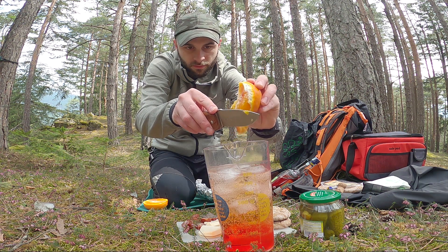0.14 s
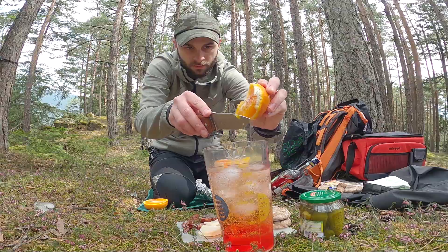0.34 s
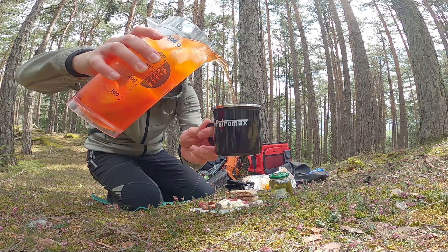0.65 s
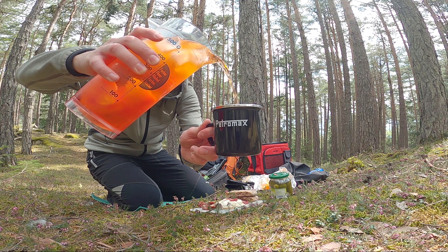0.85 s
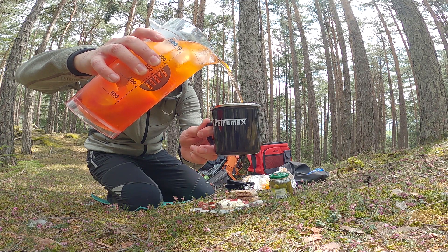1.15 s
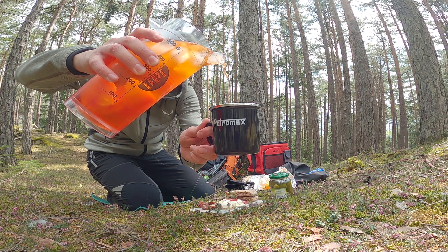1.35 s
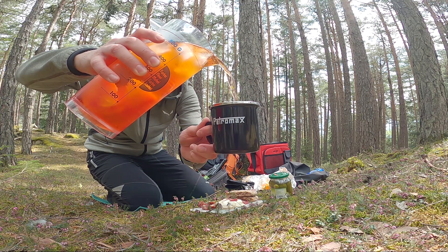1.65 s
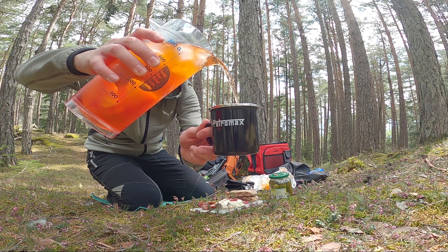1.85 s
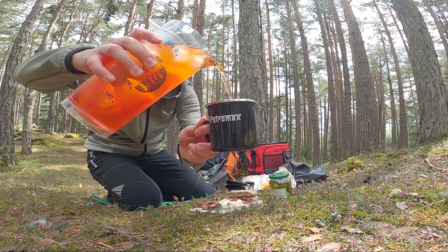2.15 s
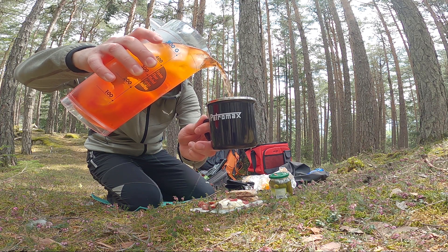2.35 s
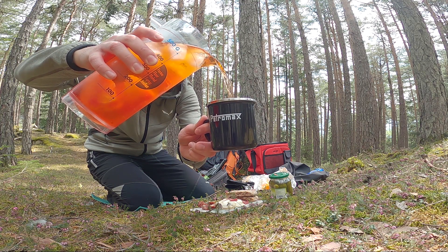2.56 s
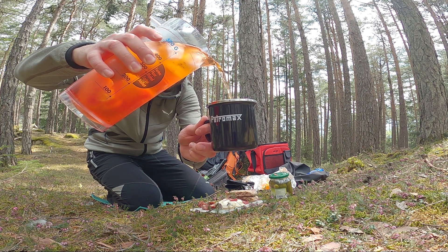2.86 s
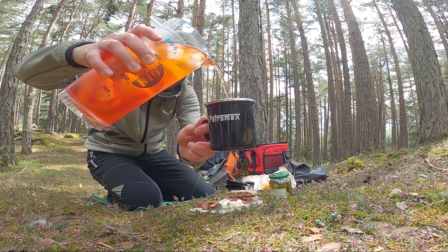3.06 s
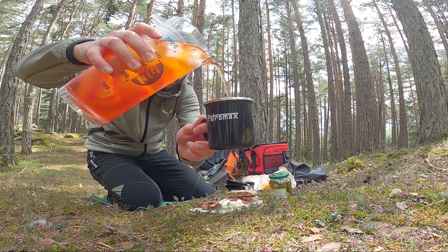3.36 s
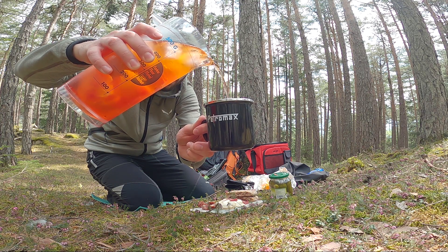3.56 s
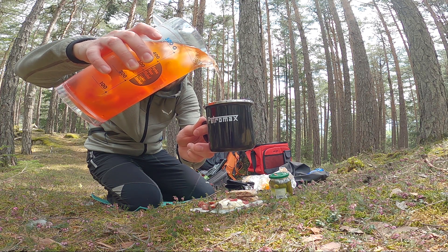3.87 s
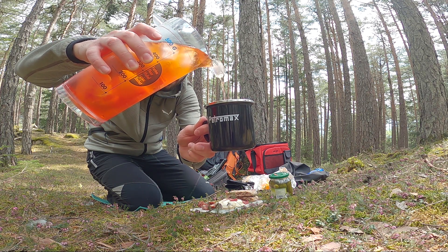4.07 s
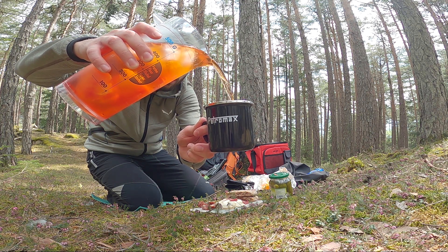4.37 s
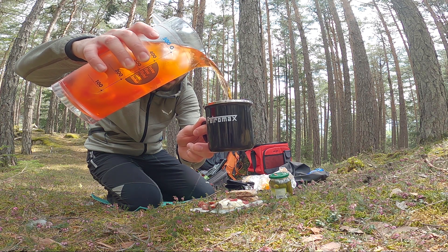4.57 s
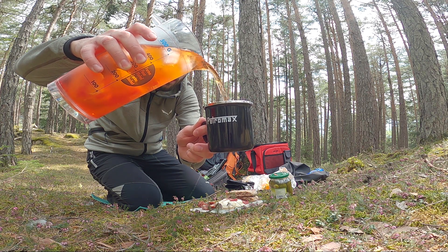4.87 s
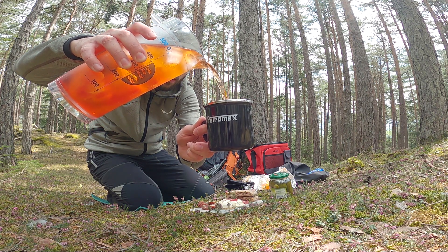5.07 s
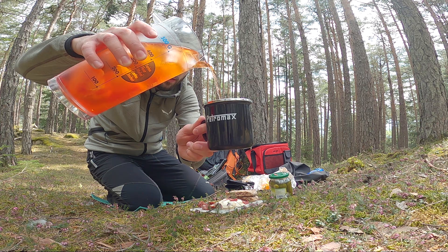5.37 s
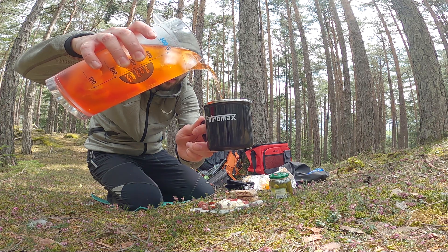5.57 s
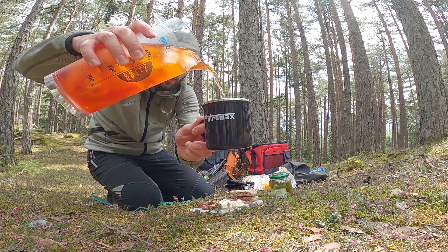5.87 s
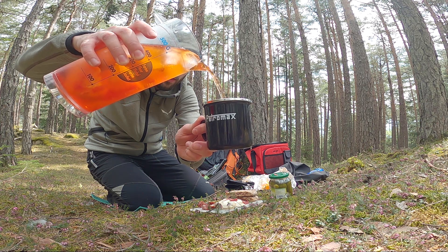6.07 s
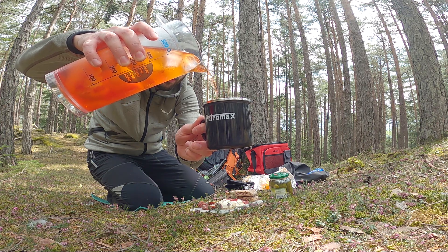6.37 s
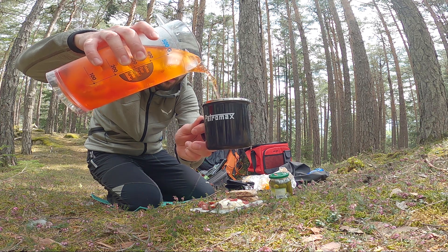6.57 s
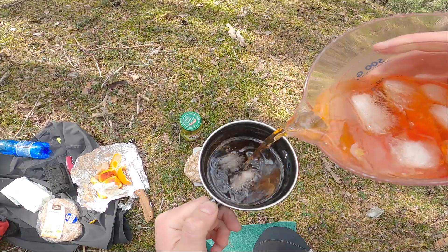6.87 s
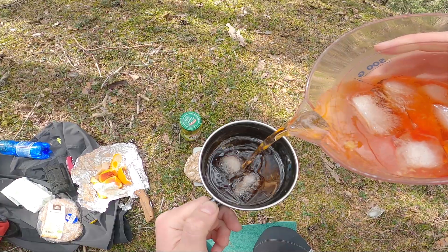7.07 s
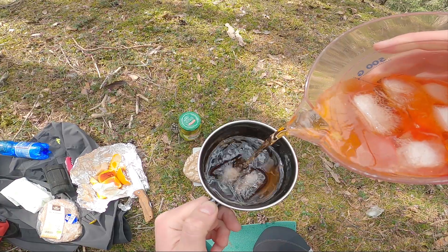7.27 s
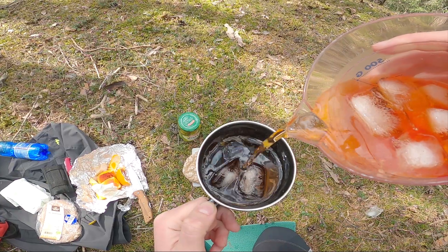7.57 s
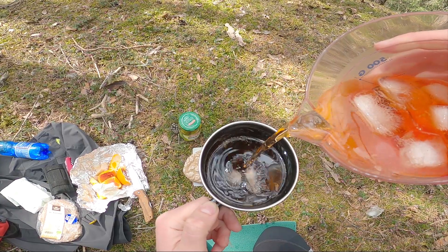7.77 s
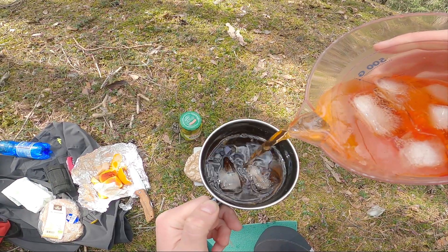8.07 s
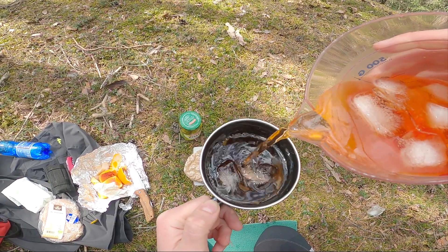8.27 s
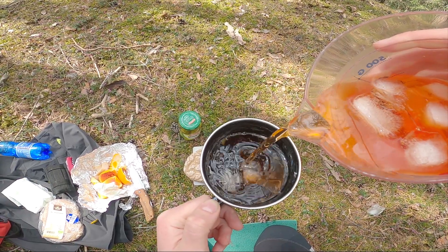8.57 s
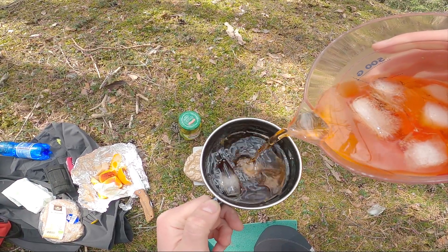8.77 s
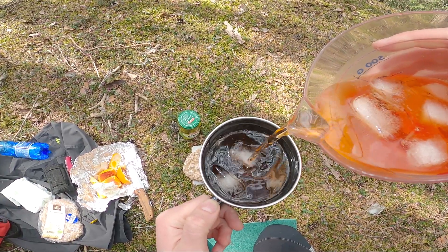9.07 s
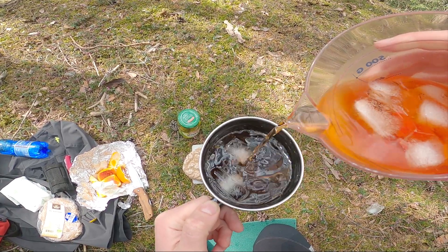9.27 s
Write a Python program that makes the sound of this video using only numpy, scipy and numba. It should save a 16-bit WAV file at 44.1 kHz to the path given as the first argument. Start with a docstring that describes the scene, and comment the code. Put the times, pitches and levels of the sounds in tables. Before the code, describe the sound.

Close and detailed outdoor pouring: after a moment of soft wind and one faint drip, liquid spatters on ice and steel, settling into lumpy gurgles with hollow plops, fizzy little bubbles and sharp ice cracks. The flow repeatedly weakens and spurts, then stops. A few tiny blips remain over low wind, light treetop rustle and a distant buzzy bird call, with only a slight echo from the trees.

```python
"""Low wind rumble and one faint drip, then an iced drink pours into a metal mug in a quiet wood.
Stream: clumped drops make noise ticks and bending bubble tones, coloured by the filling mug's resonances.
Gushes, slaps and drips are shaped noise, rings and bubbles; ice knocks and hollow plops are decaying modes
and noise cracks, with bubbles in their wake; single bubbles give low plops and short high blips.
Wind is coloured noise; a far bird, trilled sine whistles, calls in the last seconds."""
import sys
import numpy as np
from scipy import signal
from scipy.fft import rfft, irfft, next_fast_len
from scipy.io import wavfile
from scipy.ndimage import uniform_filter1d
from numba import njit

SR = 44100
rng = np.random.default_rng(int(sys.argv[2]) if len(sys.argv) > 2 else 0)


def persist_wave(psi):
    """Save psi, clipped to +-1, as 16-bit WAV."""
    counts = np.round(np.clip(psi, -1, 1) * 32767).astype(np.int16)
    wavfile.write(sys.argv[1], SR, np.atleast_2d(counts).T)


N = 415409
TIME_S = np.arange(N) / SR

# ice knocks in the mug, and some hollow plops with hardly any crack;
# levels before mode and layer gains: start_s, pitch_hz, hollow_db, crack_db
KNOCKS_AND_PLOPS = [(0.468, 860, -35, -26.5), (0.5322, 1340, -26.5, -50), (1.0665, 1050, -25, -37),
                    (1.455, 1205, -28, -40), (1.79, 1306, -23, -17.5), (1.8106, 1420, -27, -16),
                    (1.835, 984, -30.5, -17.5), (1.8715, 1310, -31, -24), (1.893, 1054, -21, -24.5),
                    (2.139, 1047, -30, -69), (2.674, 1475, -35.5, -35.5), (2.8132, 1060, -31, -39.5),
                    (2.9002, 1072, -32, -57), (2.971, 1054, -33, -57), (3.3545, 1166, -29.5, -63),
                    (4.1911, 891, -35.5, -34), (4.3216, 1396, -22.5, -25), (4.3261, 1065, -21, -23.5),
                    (4.3369, 1148, -17, -13), (4.364, 1202, -14.5, -17), (4.3815, 970, -17.5, -24),
                    (4.405, 983, -19, -35.5), (4.5725, 1205, -34, -38), (4.7707, 1095, -19, -24.5),
                    (4.796, 1400, -19.5, -32), (4.8147, 1406, -31, -34), (4.8337, 1195, -31, -37),
                    (4.9674, 1147, -36.5, -34.5), (5.197, 1891, -29, -35), (5.2586, 1307, -32, -49),
                    (5.273, 1226, -30.5, -39), (5.371, 1397, -25, -42), (5.411, 1276, -34, -42),
                    (5.8958, 1028, -28.5, -52), (6.0379, 1275, -43, -31), (6.84, 943, -35.5, -36),
                    (7.9328, 1980, -35, -39.5), (8.908, 2410, -47.5, -53.5), (9.0989, 2347, -38.5, -47.5),
                    (9.3288, 1975, -37, -44)]
# colour of the crack of ice: freq_hz, relative_db
CRACK_COLOUR = [(400, -22.5), (900, 5), (2000, 12.5), (3300, 8), (5200, 4), (6800, -3.5), (8500, -11.5),
                (11000, -23.5), (15000, -39.5)]
SMALL_CYCLES, SMALL_RISE = 11, .08  # small bubbles: life in cycles, rise as a share of pitch


def undb(db):
    """Decibels to amplitude gain."""
    return 10 ** (np.asarray(db) / 20)


def curves(table):
    """Interpolate each column of a timed table, sample by sample."""
    start_s, *columns = np.transpose(table)
    return [np.interp(TIME_S, start_s, column) for column in columns]


def add(track, start_s, sound):
    """Mix a sound into a track at a time."""
    start = max(int(start_s * SR), 0)
    part = track[start:start + len(sound)]
    part += sound[:len(part)]


def unit(x):
    """Scale to rms 1."""
    return x / np.sqrt(np.mean(x ** 2))


def even(x, span_s):
    """Hold the running rms near 1, keeping the quick grain."""
    size = int(span_s * SR)
    power = uniform_filter1d(uniform_filter1d(x ** 2, size), size)
    floor = np.mean(x ** 2) / 1000
    return x / np.sqrt(np.abs(power) + floor)


def colour(x, points):
    """Filter by an outline of (freq_hz, gain_db), straight over log frequency."""
    freq_hz, gain_db = np.transpose(points)
    size = next_fast_len(N + 4096)
    bins_hz = np.maximum(np.arange(size // 2 + 1) * SR / size, 1)
    gain = undb(np.interp(np.log(bins_hz), np.log(freq_hz), gain_db))
    return irfft(rfft(x, size) * gain, size)[:N]


@njit
def resonate(x, centre_hz, width_hz):
    """State-variable band-pass with a moving centre, gain 1 there."""
    y, band, low = np.empty(len(x)), 0., 0.
    for i in range(len(x)):
        g, damping = np.tan(np.pi * centre_hz[i] / SR), width_hz / centre_hz[i]
        v = (band + g * (x[i] + 1e-18 - low)) / (1 + g * (g + damping))
        band, low, y[i] = 2 * v - band, low + 2 * g * v, damping * v
    return y


def fade(t60_s):
    """Exponential decay down to -60 dB."""
    return np.exp(-np.log(1000) * np.arange(int(t60_s * SR) + 2) / (t60_s * SR))


def burst(attack_s, hold_s, t60_s):
    """Hold then exponential decay, under a linear attack from the start."""
    shape = np.concatenate([np.ones(int(hold_s * SR)), fade(t60_s)])
    return shape * np.minimum(np.arange(len(shape)) / (attack_s * SR), 1)


def ring(pitch_hz, t60_s):
    """One struck mode: a decaying sine that takes a cycle or two to build."""
    decay = fade(t60_s)
    cycles = pitch_hz * np.arange(len(decay)) / SR
    build = 1 - np.exp(-(cycles / 1.65) ** 2)
    return decay * build * np.sin(2 * np.pi * cycles)


def bubble(first_hz, last_hz, length_s, swell):
    """A bubble swells, then dies away, its pitch bending ever faster as it nears the surface."""
    u = np.linspace(0, 1, max(int(length_s * SR), 8))
    shape = (1 - np.exp(-(u / swell) ** 2)) * (1 - u) ** 0.92
    pitch_hz = first_hz + (last_hz - first_hz) * u ** 2
    return shape / shape.max() * np.sin(2 * np.pi * np.cumsum(pitch_hz) / SR)


def in_mug(x, t60_s=0.021, wet_db=-7):
    """Add bounces between the steel walls: convolution with decaying noise."""
    decay = fade(t60_s)
    echo = decay * rng.standard_normal(len(decay))
    return x + undb(wet_db) * signal.fftconvolve(x, echo / np.linalg.norm(echo))[:N]


def pour():
    """Gains of gurgle, splash and spray: choked flow plus spurts, summed in power."""
    # stream strength: strong at first, then swelling and thinning by turns until it stops:
    # time_s, strength_db
    flow_table = [(.44, -84), (.48, -59), (.7, -60), (.765, -68), (.83, -53.5), (1.2, -50), (1.45, -55),
                  (1.7, -54.5), (1.95, -57.5), (2.3, -66), (3.0, -59), (3.85, -66), (4.3, -56), (4.7, -65),
                  (5.35, -65), (5.9, -54), (6.22, -64), (6.7, -59), (7.1, -64), (7.74, -62.5),
                  (7.95, -81.5)]
    # treble lift, higher where the stream lands on ice than in the drink: time_s, brightness_db
    bright_table = [(.95, 7), (1.15, -0.5), (1.4, 1), (1.68, 8.5), (2.05, 0.5), (5.6, 1.5), (7.35, 8),
                    (8.0, -4)]
    # ice chokes the spout for a moment: start_s, length_s
    choke_table = [(0.723, 0.056), (2.403, 0.071), (5.07, 0.0544), (7.826, 0.08)]
    # a faint drip, then spurts that slip past the ice: start_s, hold_s, strength_db, brightness_db
    spurt_table = [(0.182, 0.04, -81, 19.5), (.68, 0.022, -56, 4), (0.791, 0.086, -53.5, 14.5),
                   (0.937, 0.048, -55, 14), (1.043, 0.059, -45, -0.5), (1.468, 0.06, -46, 1.5),
                   (3.005, .16, -53, -1.5), (3.549, 0.046, -54.5, -4.5), (4.063, 0.062, -49, -2),
                   (4.956, 0.021, -51.5, -2), (5.61, 0.041, -56, 2.5), (6.028, 0.055, -56, 10),
                   (6.317, 0.089, -63.5, 11), (6.762, 0.039, -51, 3.5), (7.651, 0.1, -57, -1.5)]
    choke_db, choke_ramp_s = -12, .02
    spurt_attack_s, spurt_t60_s = .005, .14

    (flow_db,), (bright_db,) = curves(flow_table), curves(bright_table)
    for start_s, length_s in choke_table:
        inside_s = np.minimum(TIME_S - start_s, start_s + length_s - TIME_S)
        flow_db = flow_db + choke_db * np.clip(inside_s / choke_ramp_s + .5, 0, 1)
    gains = []
    # layer level against the gurgle; dB of layer per dB of brightness
    for layer_db, tilt in [(0, 0), (-6, 1), (-13.5, 1.0)]:
        power = undb(flow_db + tilt * bright_db) ** 2
        for start_s, hold_s, spurt_db, spurt_bright_db in spurt_table:
            envelope = burst(spurt_attack_s, hold_s, spurt_t60_s)
            add(power, start_s, (undb(spurt_db + tilt * spurt_bright_db) * envelope) ** 2)
        gains.append(undb(layer_db) * np.sqrt(power))
    return gains


def landings(flow, spread_db, lumpy_db=7.0, lumps_per_s=28):
    """Drop times and sizes: many small, few large, in clumps of size as the stream necks and breaks."""
    trickle_drops_per_s, extra_drops_per_s, full_flow_db = 350, 1200, -50
    rate_per_s = trickle_drops_per_s + extra_drops_per_s * np.minimum(flow / undb(full_flow_db), 1)
    times_s = np.flatnonzero(rng.random(N) < rate_per_s / SR) / SR
    lumps = np.clip(rng.standard_normal(1024), -2, 2)
    lump_db = lumpy_db * np.interp(times_s * lumps_per_s, np.arange(len(lumps)), lumps)
    drop_db = spread_db * np.minimum(rng.exponential(size=len(times_s)), 3.0)
    return times_s, undb(lump_db + drop_db)


def froth(flow, centre_hz, octaves, cycles, rise, share, spread_db):
    """A share of drops trap a bubble, pitched around a moving centre; most bend up, some down."""
    out = np.zeros(N)
    times_s, sizes = landings(flow, spread_db)
    centres_hz = np.interp(times_s, TIME_S, centre_hz * np.ones(N))
    chances = rng.standard_normal((len(times_s), 3))
    lucks = rng.random(len(times_s))
    for start_s, size, middle_hz, chance, luck in zip(times_s, sizes, centres_hz, chances, lucks):
        if luck < share:
            pitch, life, bend = chance
            first_hz = middle_hz * 2 ** (octaves * np.clip(pitch, -2, 2))
            last_hz = first_hz * (1 + rise * (1 + 2 * np.tanh(bend)))
            length_s = cycles * np.exp(0.35 * life) / first_hz
            add(out, start_s, size * bubble(first_hz, last_hz, length_s, 0.19))
    return unit(out)


def slosh(points_per_s=14):
    """Random sway of the drink, linear between normal draws."""
    points = rng.standard_normal(512)
    return np.interp(TIME_S * points_per_s, np.arange(len(points)), points)


def stream():
    """Drops tick and trap bubbles; the mug's air and wall resonances colour them."""
    # the mug as it fills: time_s, air_hz, cross_hz, wall_hz
    fill_table = [(.5, 1082, 2730, 2160), (1.25, 980, 2760, 2056), (2.2, 1171, 2750, 1773),
                  (4.2, 1127, 2840, 1520), (5.6, 1382, 2800, 1363), (6.6, 1445, 3132, 1280),
                  (7.8, 1660, 3270, 1150)]
    # spray bubbles get finer as the mug fills: time_s, pitch_hz
    spray_table = [(4.5, 5100), (6, 6500)]
    wall_waver = .008  # share by which the sloshing drink bends the wall's pitches

    flow, splash_gain, spray_gain = pour()
    air_hz, cross_hz, wall_hz = curves(fill_table)
    spray_hz, = curves(spray_table)

    times_s, sizes = landings(flow, spread_db=9.0)
    impacts = np.zeros(N)
    impacts[(times_s * SR).astype(int)] = sizes
    ticks = unit(signal.fftconvolve(impacts, fade(0.0035))[:N] * rng.standard_normal(N))
    large = froth(flow, air_hz, octaves=.28, cycles=13, rise=0.04, share=0.39, spread_db=9.0)
    small = froth(flow, 2600, octaves=.52, cycles=SMALL_CYCLES, rise=SMALL_RISE, share=.8, spread_db=7.5)
    fine = froth(flow, spray_hz, octaves=.33, cycles=12, rise=.1, share=0.8, spread_db=12.0)

    hollow = unit(resonate(ticks, air_hz, 200.)) + undb(4.5) * unit(resonate(ticks, air_hz * 1.27, 300.))
    gurgle = colour(hollow + undb(7.5) * large, [
        (300, -42.0), (680, -18.0), (950, 11.0), (1700, -0.5), (3000, -19.5), (8000, -34.0)])

    splash = colour(ticks, [
        (600, -19.0), (1500, 11.5), (2200, 10.5), (4300, 2.5), (6000, -30.5), (12000, -41.0)])
    cross = unit(resonate(ticks, cross_hz, 150.0))
    splash = unit(splash) + undb(11) * small + undb(3.5) * cross

    spray = colour(ticks, [
        (2000, -33.5), (4000, -0.5), (5200, -2.0), (6800, -9.0),
        (8700, -3.0), (10500, -15.5), (13000, -16.5), (15500, -30.5)])
    spray = unit(spray) + undb(6.0) * colour(fine, [(9000, 1.0), (12000, -11)])

    splash, spray = (unit(in_mug(layer, t60_s=.026, wet_db=-8)) for layer in (splash, spray))
    # the wall sings only while the stream still hits bare ice and metal
    sway = 1 + wall_waver * slosh()
    wall_modes = [(wall_hz, -11), (2725, -13), (3720, -22)]
    wall = sum(undb(db) * unit(resonate(ticks, hz * sway, 24.)) for hz, db in wall_modes)
    splash = splash + wall * np.interp(TIME_S, [1.75, 2.1], [1, 0])
    return flow * even(gurgle, 0.19) + splash_gain * even(splash, 0.055) + spray_gain * even(spray, 0.15)


def gush(drops_per_s=1500):
    """A dense spatter of heavy drops on the ice and almost empty bottom: coloured random impulses."""
    # start_s, level_db
    gush_table = [(0.455, -32.5), (0.524, -45.5)]
    weight = np.zeros(N)
    for start_s, level_db in gush_table:
        add(weight, start_s, undb(level_db) * burst(attack_s=0.013, hold_s=0.0091, t60_s=0.23))
    drops = (rng.random(N) < drops_per_s / SR) * rng.standard_normal(N)
    drum = colour(drops, [
        (200, -43), (320, 8.0), (500, -7.5), (900, 11.0),
        (1900, 5.0), (3000, -7.5), (9000, -24), (15000, -51)])
    return weight * even(drum, 0.019)


def slaps(count=6, lag_s=.005, fizz_hz=3100, octaves=.5):
    """Each fat drop ticks, sounds a short hollow note and scatters a cluster of small bubbles."""
    # levels before the offsets below: start_s, hollow_db, pitch_hz, splash_db
    slap_table = [(0.938, -40, 1470, -41), (1.013, -39, 1070, -42.5), (1.048, -30, 1035, -43),
                  (1.167, -33, 939, -42.5), (1.276, -36, 996, -49), (1.476, -32, 940, -41.5),
                  (2.023, -36, 950, -51), (2.291, -38.5, 1100, -46.5), (2.552, -41.5, 1480, -44.5),
                  (2.715, -38, 877, -58), (3.016, -30, 1340, -49), (3.089, -36, 1322, -50),
                  (3.154, -35, 1369, -61), (4.102, -30, 1040, -54), (5.681, -36, 1160, -47),
                  (6.134, -37, 1188, -47.5), (6.656, -32, 1070, -53)]
    t60_s, hollow_offset_db, tick_offset_db, fizz_offset_db = 0.031, -2, -4, -0.5
    out, taps = np.zeros(N), np.zeros(N)
    chances = rng.standard_normal((len(slap_table), count, 2))
    for (start_s, hollow_db, pitch_hz, splash_db), chance in zip(slap_table, chances):
        note_db = hollow_db + hollow_offset_db
        add(out, start_s, undb(note_db) * ring(pitch_hz, t60_s))
        add(out, start_s, undb(note_db - 7) * ring(pitch_hz * 1.1, t60_s))
        add(taps, start_s, undb(splash_db + tick_offset_db) * fade(0.026))
        for lag, pitch in chance:
            first_hz = fizz_hz * 2 ** (octaves * np.clip(pitch, -2, 2))
            fizz = bubble(first_hz, first_hz * (1 + SMALL_RISE), SMALL_CYCLES / first_hz, 0.1)
            fizz_db = splash_db + fizz_offset_db - 3 * abs(lag)
            add(out, start_s + lag_s * abs(lag), undb(fizz_db) * fizz)
    tick = unit(colour(rng.standard_normal(N), CRACK_COLOUR))
    return in_mug(out + taps * tick, t60_s=.05, wet_db=-9.5)


def drips(count=3, lag_s=0.0042, below_db=-9):
    """Each drip ticks on the surface, traps one short rising bubble and throws off a few weaker ones."""
    # heavy drips that break from the stream: start_s, bubble_db, pitch_hz
    drip_table = [(1.546, -33, 4110), (1.641, -31.5, 4370), (1.704, -34.5, 4643), (2.945, -41.5, 2038),
                  (3.056, -45.5, 2600), (4.759, -38.5, 3366), (5.136, -38, 1942), (5.198, -37.5, 2680),
                  (5.259, -35, 3130), (5.452, -41.5, 6410), (5.52, -42, 1900), (5.918, -41, 2983),
                  (5.958, -35.5, 2900), (6.084, -38, 3002), (6.719, -39.5, 2280), (7.014, -38, 3020),
                  (7.052, -45, 4850), (7.07, -41, 2870), (7.146, -43, 4200), (7.41, -41.5, 2250),
                  (7.451, -38, 4600), (7.492, -44.5, 1699), (7.574, -40.5, 2370), (7.251, -42, 3100),
                  (7.812, -49, 2290), (8.022, -55.5, 2810),]
    tick_db, life_cycles, rise = -13, 11, .14  # tick against its bubble; rise as a share of pitch
    out, taps = np.zeros(N), np.zeros(N)
    chances = rng.standard_normal((len(drip_table), count, 2))
    for (start_s, level_db, pitch_hz), chance in zip(drip_table, chances):
        add(taps, start_s, undb(level_db + tick_db) * fade(0.046))
        trapped = [(start_s, level_db, pitch_hz)]
        for lag, pitch in chance:
            extra_hz = pitch_hz * 2 ** (0.89 * np.tanh(pitch))
            trapped.append((start_s + lag_s * abs(lag), level_db + below_db, extra_hz))
        for at_s, bubble_db, first_hz in trapped:
            sound = bubble(first_hz, first_hz * (1 + rise), life_cycles / first_hz, 0.12)
            add(out, at_s, undb(bubble_db) * sound)
    tick = unit(colour(rng.standard_normal(N), [
        (700, -30.5), (1300, 4), (3500, -10), (8500, -21.5), (14000, -36.5)]))
    return in_mug(out) + taps * tick


def ice():
    """Knocks and plops: a hollow note damped by the drink, with cube ring and noise crack; clinks besides."""
    # hollow note: pitch_multiple, level_db against hollow_db, t60_s
    hollow_modes = [(1, 4, 0.027), (.78, -17, 0.056), (1.3, -10, 0.038), (1.75, -11, 0.011),
                    (1.08, -18.5, 0.058)]
    # the ice's own ring, varied at each blow: pitch_hz, level_db against the crack, t60_s
    cube_modes = [(2087, -9.5, 0.021), (2965, -4.5, 0.026), (4062, -8.5, 0.018), (4810, -11.5, 0.015),
                  (8040, -21.5, 0.016)]
    # ringing clinks of ice and metal: start_s, level_db, pitch_hz, t60_s
    clink_table = [(.362, -57, 2266, .18), (.55, -56, 2250, .6), (.577, -47, 3750, .2),
                   (.613, -36, 2745, .041), (.616, -36, 4330, .057), (.685, -43, 3660, .11),
                   (.795, -41, 3680, .12), (.817, -32, 2724, .061), (.818, -25.5, 3720, .056),
                   (.86, -38, 3730, .09), (1.812, -26, 3210, .049), (1.835, -29.5, 3200, .079),
                   (1.861, -31, 2000, .057), (1.87, -22.5, 3410, .025), (1.871, -19.5, 1990, .022),
                   (1.892, -18, 1920, .017), (1.893, -48, 785, .56)]
    rings, cracks = np.zeros(N), np.zeros(N)
    chances = rng.uniform(-1.2, 1, (len(KNOCKS_AND_PLOPS), 3, len(cube_modes)))
    for (start_s, pitch_hz, hollow_db, crack_db), chance in zip(KNOCKS_AND_PLOPS, chances):
        for (multiple, mode_db, t60_s), off in zip(hollow_modes, chance[0]):
            mode_hz = pitch_hz * multiple * (1 + 0.045 * off * (multiple - 1))
            add(rings, start_s, undb(hollow_db + mode_db) * ring(mode_hz, t60_s))
        for (mode_hz, mode_db, t60_s), off, strength in zip(cube_modes, chance[1], chance[2]):
            level_db = crack_db + mode_db + 3.8 * strength
            add(rings, start_s, undb(level_db) * ring(mode_hz * (1 + .13 * off), t60_s))
        add(cracks, start_s, undb(crack_db - 11.0) * fade(0.026))
    for start_s, level_db, pitch_hz, t60_s in clink_table:
        add(rings, start_s, undb(level_db) * ring(pitch_hz, t60_s))
    crack_noise = unit(colour(rng.standard_normal(N), CRACK_COLOUR))
    blows = in_mug(rings + cracks * crack_noise, t60_s=0.0501, wet_db=-19)
    # the small mug radiates almost no bass
    return signal.sosfilt(signal.butter(4, 670, "high", fs=SR, output="sos"), blows)


def wake(count=9, lag_s=.022, below_db=-18):
    """Each knock or hollow plop stirs up a tail of small bubbles that dies away after it."""
    out = np.zeros(N)
    chances = rng.standard_normal((len(KNOCKS_AND_PLOPS), count, 2))
    for (start_s, pitch_hz, hollow_db, _), chance in zip(KNOCKS_AND_PLOPS, chances):
        for lag, pitch in chance:
            octaves = .65 * abs(pitch)
            first_hz = pitch_hz * 2 ** octaves
            level_db = hollow_db + below_db - 3 * abs(lag) - 3 * octaves
            sound = bubble(first_hz, (1 + SMALL_RISE) * first_hz, 17 / first_hz, 0.11)
            add(out, start_s + lag_s * abs(lag), undb(level_db) * sound)
    return in_mug(out, t60_s=0.037, wet_db=-6)


def single_bubbles():
    """Single bubbles, low plops and short high blips, from ice and gulps of the stream."""
    # start_s, peak_db, pitch_hz, rise as a share of pitch, length_s
    bubble_table = [(0.986, -36.5, 1280, -0.14, 0.015), (1.105, -32, 3390, -0.035, 0.014),
                    (1.243, -37.5, 890, 0.24, 0.028), (1.295, -36.5, 910, 0.077, 0.022),
                    (1.669, -32.5, 1345, -0.082, 0.018), (1.779, -28, 908, -0.12, 0.024),
                    (1.791, -8, 1940, 0.12, 0.0056), (1.7917, -17, 972, 0.15, 0.013),
                    (2.675, -34, 2395, -0.12, 0.0072), (3.016, -41.5, 730, -0.028, 0.016),
                    (3.365, -44, 1163, 0.39, 0.039), (3.713, -40, 1322, 0.05, 0.011),
                    (4.321, -16.5, 1406, 0.00097, 0.011), (4.336, -17.5, 2900, 0.0083, 0.017),
                    (4.363, -25, 783, 0.11, 0.016), (4.409, -22, 920, 0.87, 0.032),
                    (5.893, -39.5, 583, 0.18, 0.014), (5.904, -37, 806, 1, 0.023),
                    (6.01, -54, 495, -0.17, 0.1), (6.034, -29, 3630, -0.34, 0.0069),
                    (6.368, -43, 3300, 0.16, 0.011), (6.451, -30, 1582, -0.02, 0.011),
                    (6.455, -36, 2944, 0.39, 0.01), (7.272, -32, 2096, -0.036, 0.0091),
                    (7.971, -48.5, 2320, 0.095, 0.01), (8.022, -52, 1620, .03, .022),
                    (8.643, -45, 2220, 0.16, 0.013), (9.1, -45.5, 1400, 0.047, 0.028)]
    out = np.zeros(N)
    for start_s, peak_db, pitch_hz, rise, length_s in bubble_table:
        swell = 0.023 + 0.59 * abs(rise)  # slower swell if the pitch bends far
        add(out, start_s, undb(peak_db) * bubble(pitch_hz, pitch_hz * (1 + rise), length_s, swell))
    return out


def trees(x, t60_s, wet_db):
    """Trunks scatter a thin, dull echo: convolution with low-passed decaying noise."""
    decay = fade(t60_s)
    dull = signal.butter(1, 3500, fs=SR, output="sos")
    echo = signal.sosfilt(dull, decay * rng.standard_normal(len(decay)))
    return undb(wet_db) * signal.fftconvolve(x, echo / np.linalg.norm(echo))[:N]


def bird(trill_hz=43, depth_hz=250):
    """Arched whistles, trilled in quick downward flicks, that linger among the trunks."""
    # buzzy phrases: start_s, length_s, first_hz, middle_hz, last_hz, level_db
    phrase_table = [(6.835, 0.16, 3870, 3900, 3786, -68), (7.719, 0.21, 3284, 3259, 3198, -71.5),
                    (8.394, 0.18, 3600, 3680, 3494, -65.5), (8.468, .08, 4150, 4250, 4160, -72.5),
                    (8.553, 0.16, 3307, 2920, 2830, -68.5), (9.346, 0.1, 3740, 3906, 3980, -70.5)]
    out = np.zeros(N)
    for start_s, length_s, first_hz, middle_hz, last_hz, level_db in phrase_table:
        t_s = np.arange(int(length_s * SR)) / SR
        parabola = np.polyfit([0, .5, 1], [first_hz, middle_hz, last_hz], 2)
        arch_hz = np.polyval(parabola, t_s / length_s)
        pitch_hz = arch_hz + depth_hz * (1 - 2 * (trill_hz * t_s % 1))
        whistle = np.hanning(len(t_s)) ** .5 * np.sin(2 * np.pi * np.cumsum(pitch_hz) / SR)
        add(out, start_s, undb(level_db) * whistle)
    return out + trees(out, t60_s=.8, wet_db=-5)


def wind():
    """Low rumble in gusts and a soft treetop rustle that grows toward the end: two coloured noises."""
    # colour of the air in front of the mug: freq_hz, relative_db
    front_colour = [(20, -9.5), (35, -9.5), (55, 6.5), (80, -4.5), (125, -12.5), (200, -17), (300, -25.5),
                    (500, -37.5), (1200, -39), (2500, -50), (5000, -53), (10000, -67.5), (15000, -79)]
    # colour of the air above the mug: freq_hz, relative_db
    above_colour = [(20, -14.5), (43, -2.5), (64, 1.5), (92, -7), (217, -17), (300, -25), (850, -29.5),
                    (2000, -43.5), (4000, -62), (15000, -81)]
    # gusts in the rumble: time_s, level_db
    gust_table = [(0, -43.5), (5.4, -44.5), (6.1, -41.5), (8.4, -45), (9.42, -41)]
    rumble_db, = curves(gust_table)
    above_share = np.clip(np.interp(TIME_S, [3, 6.2, 8], [0, .25, 1]), 0, 1)
    front = unit(colour(rng.standard_normal(N), front_colour))
    above = unit(colour(rng.standard_normal(N), above_colour))
    air = np.sqrt(1 - above_share) * front + np.sqrt(above_share) * above
    rumble = signal.sosfiltfilt(signal.butter(2, 140, fs=SR, output="sos"), air)
    rustle = air - rumble
    return undb(rumble_db) * even(rumble, 0.29) + undb(-43.0) * rustle


def scene():
    """The pour close by, the wood around it."""
    drink = stream() + gush() + slaps() + drips() + ice() + wake() + single_bubbles()
    return (drink + trees(drink, t60_s=0.37, wet_db=-30.0) + bird() + wind())[None]


def record(dry):
    """Steep low-pass: the treble stops at 15.5 kHz."""
    top_hz = 15500
    return signal.sosfilt(signal.ellip(8, .2, 70, top_hz, fs=SR, output="sos"), dry)


dry = scene()
out = record(dry)
persist_wave(out)
```